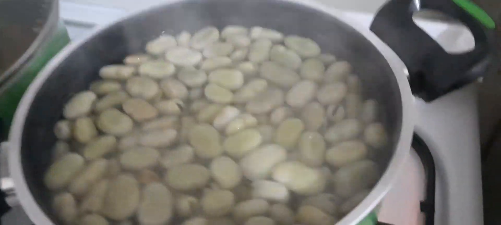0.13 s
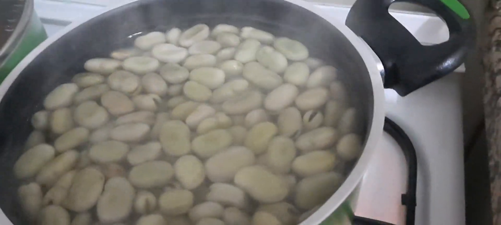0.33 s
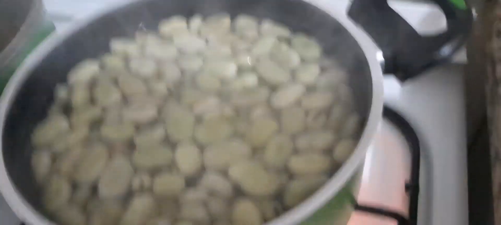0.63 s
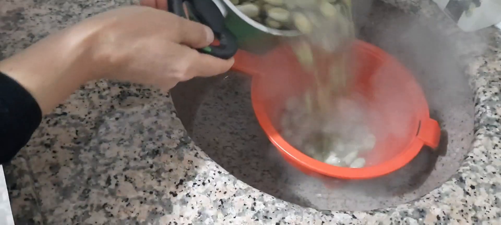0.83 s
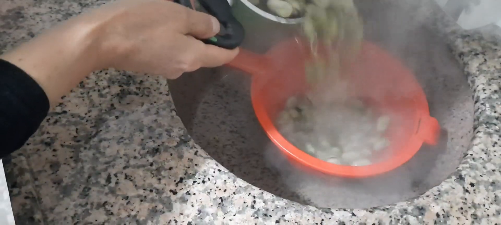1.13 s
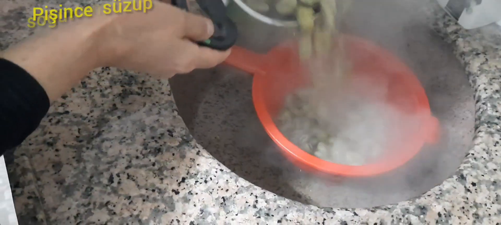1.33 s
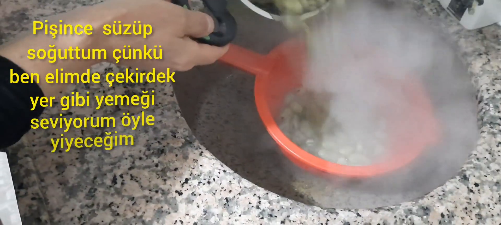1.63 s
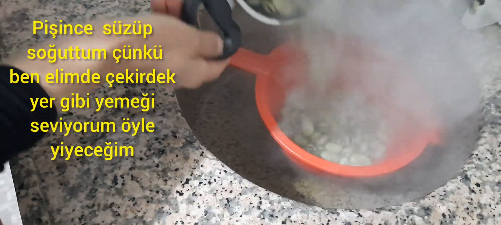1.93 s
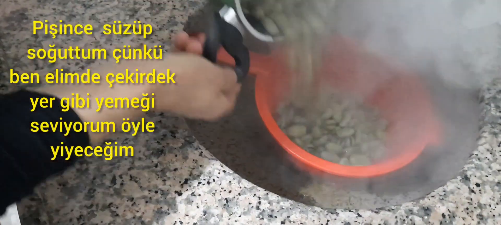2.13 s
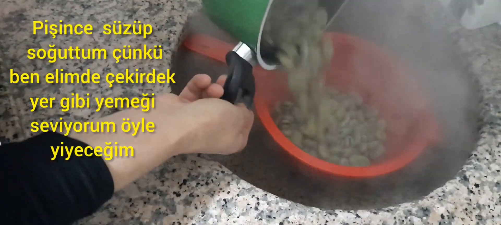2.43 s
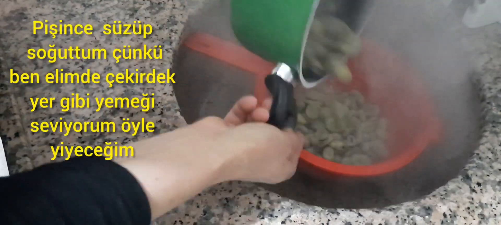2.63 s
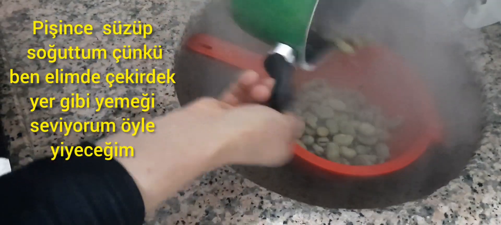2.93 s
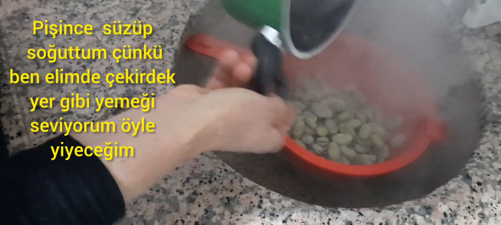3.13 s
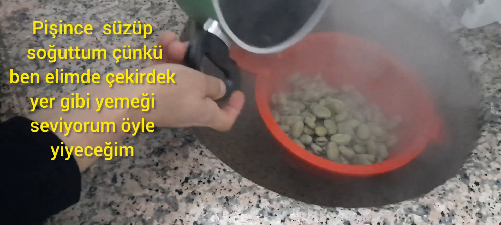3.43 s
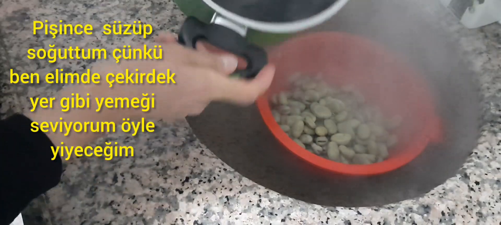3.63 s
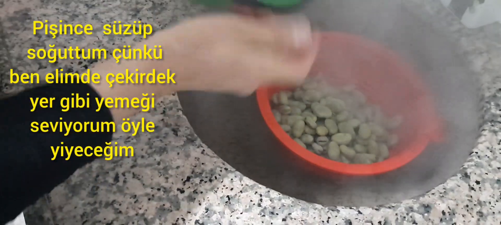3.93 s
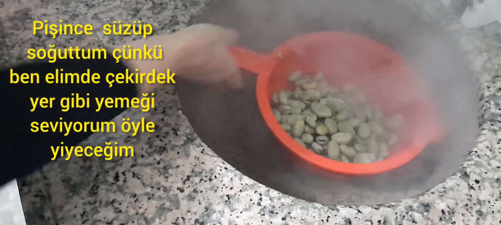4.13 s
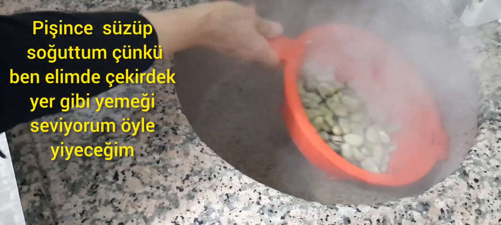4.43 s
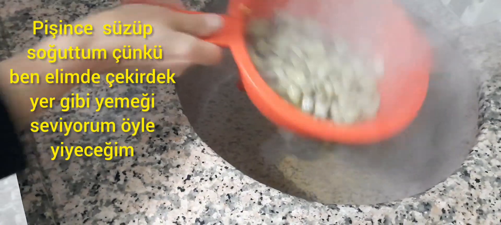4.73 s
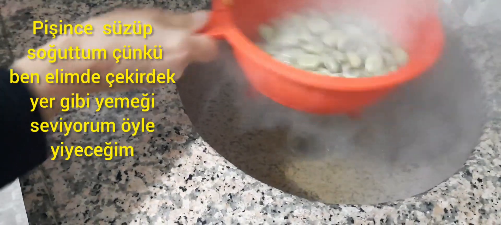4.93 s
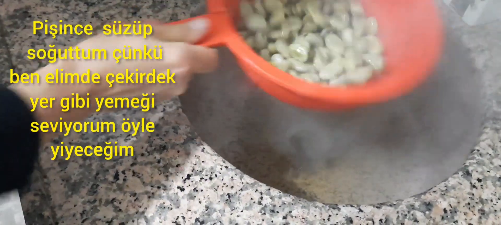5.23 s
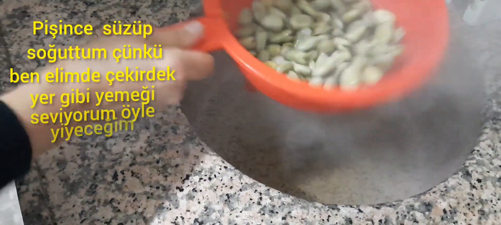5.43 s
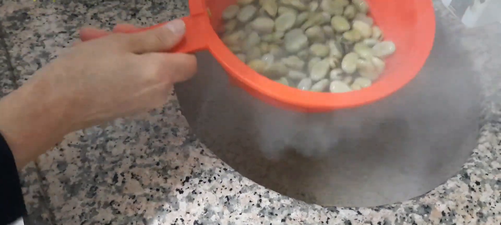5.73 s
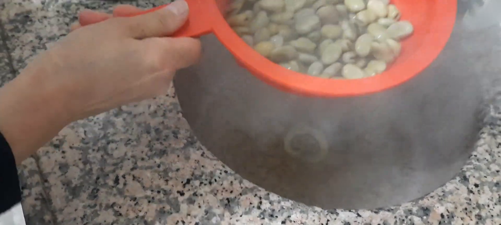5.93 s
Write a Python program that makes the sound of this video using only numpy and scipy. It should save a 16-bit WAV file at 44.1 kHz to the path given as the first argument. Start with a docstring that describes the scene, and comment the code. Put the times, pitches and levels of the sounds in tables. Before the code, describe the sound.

A soft gas burner hisses over low kitchen hum, then cuts to a close, loud pour: water and beans crash through a plastic colander into a steel sink, with drumming, thuds and sharp drops. The pot rings as it rubs the sink edge, water thins to trickling, the colander knocks and wet beans rustle as they are tossed. A hard pot knock is cut off. Close stereo pickup, small reflective kitchen.

```python
"""Beans and their water are emptied from a pot into a plastic colander in a steel sink, close to a microphone pair.
Before that, a gas stove hisses over the hum and rumble of the kitchen; a short silence parts the two scenes.
Filtered random impacts make water and rustling; decaying modes make sink, pot and colander ring as they are struck.
The pot rubs the sink's edge, the colander is dragged, knocked and tossed; a last pot knock is cut into silence."""
import sys
import numpy as np
from scipy import signal
from scipy.fft import rfft, irfft
from scipy.io import wavfile
from scipy.ndimage import uniform_filter1d

SR = 44100
rng = np.random.default_rng(int(sys.argv[2]) if len(sys.argv) > 2 else 0)


def wrap_up_sound(samples):
    """Save the sound to the file named by the first command line argument, as 16-bit audio."""
    columns = np.atleast_2d(samples).T
    # keep every value between -1 and 1, then stretch to whole-number steps
    tamed = np.clip(columns, -1, 1)
    steps = np.round(tamed * 32767).astype(np.int16)
    wavfile.write(sys.argv[1], SR, steps)


N = 268436
TIME, HZ = np.arange(N) / SR, np.fft.rfftfreq(N, 1 / SR)
STOVE_SPAN_S, SINK_SPAN_S = (0, 0.657), (0.677, 5.799)  # start and end of each scene
LEFT_LAG = 12  # samples by which the left port hears later

# Splashing water before any tilt. Each row: frequency in Hz, spectrum level in dB per Hz.
SPLASH = [(240, -34.5), (400, -7), (432, -1), (588, -12), (666, -11.5), (789, -3.5), (1200, -8.5),
          (1420, -5.5), (1840, -8), (3580, -8.5), (5960, -10.5), (8000, -9), (9100, -18), (10600, -22.5),
          (11800, -12.5), (16000, -24.5)]
# Modes of the steel basin. Each row: frequency in Hz, width in Hz, level in dB before any tilt.
SINK = [(64.4, 5.7, -11.5), (102, 21.3, 0), (150.8, 83, -9), (199.4, 34, -6), (294.7, 11.9, 4),
        (378, 43, -5.5), (595.4, 44.4, -7), (786, 36, -10), (1540, 106, -28)]
# Modes of the plastic colander. Each row: frequency in Hz, width in Hz, level in dB.
COLANDER = [(106.3, 14, 2), (286, 15, 4), (404, 37, -6.5), (498, 13, -11), (920, 46, 4.5), (1210, 640, -12),
            (1634, 220, -6), (2110, 260, -5), (2514, 250, -12), (3553, 220, -34.5), (4330, 170, -29)]
# The stream as the pot is tipped, eased back, then upended. Each row: time in seconds, level in dB.
FLOW = [(0.679, -42.5), (0.725, -37.5), (0.751, -34), (0.9, -36.5), (1.32, -36.5), (1.43, -38.5),
        (1.6, -39), (1.94, -42), (2.04, -40), (2.17, -45), (2.3, -39), (2.55, -42.5), (2.671, -50.5),
        (2.82, -64)]


def amp(db):
    """Decibels as a linear gain."""
    return 10 ** (np.asarray(db) / 20)


def evened(x):
    """Unit rms, as heard in the middle of the pair."""
    return x / np.sqrt(np.mean(np.atleast_2d(x).mean(0) ** 2) + 1e-20)


def peaked(x):
    """Unit peak."""
    return x / abs(x).max()


def read(points, hz):
    """Reads a table of (Hz, value) along a log-frequency axis."""
    f, value = np.transpose(points)
    return np.interp(np.log(hz + 1), np.log(f + 1), value)


def level(s, db):
    """A dB curve as a gain, practically silent outside its span."""
    return amp(np.interp(TIME, s, db, left=-120, right=-120))


def swell(start, length, rise_s, fall_s):
    """A gain that rises, holds to the end of its length, then dies away."""
    age = TIME - start
    return np.clip(age / rise_s, 0, 1) * np.exp(-np.maximum(age - length, 0) / fall_s)


def add(mix, s, sound):
    """Lays a sound into the mix from the given second."""
    part = mix[round(s * SR):][:len(sound)]
    part += sound[:len(part)]


def colour(x, spectrum, tilt_db=0):
    """Causal minimum-phase filter with the given spectrum, tilted by dB per octave."""
    hz = abs(np.fft.fftfreq(2048, 1 / SR))
    tilt = tilt_db * np.log2(hz / 1000 + .1)
    log_gain = np.log(amp(np.maximum(read(spectrum, hz) + tilt, -90)))
    taps = np.fft.ifft(np.exp(np.conj(signal.hilbert(log_gain)))).real
    return signal.oaconvolve(x, taps)[:len(x)]


def ring(modes, tilt_db=0):
    """The answer of a body to one blow; a harder contact tilts it towards the high modes."""
    t = TIME[:SR // 3]
    total = 0
    for k, (hz, width, db) in enumerate(modes):
        strength = (-1) ** k * amp(db + tilt_db * np.log2(hz)) * width
        total = total + strength * np.exp(-np.pi * width * t) * np.sin(2 * np.pi * hz * t)
    return total


def patter(per_s, spread_db):
    """Random impacts of either sign, their sizes spread exponentially in dB."""
    size = amp(spread_db * np.minimum(rng.exponential(1, N), 4.5))
    return size * rng.choice([-1, 1], N) * (rng.random(N) < per_s / SR)


def wander(rate_hz):
    """Smooth random drift of unit rms."""
    return evened(irfft(rfft(rng.standard_normal(N)) / (1 + (HZ / rate_hz) ** 4), N))


def patchy(x, depth_db):
    """The colour changes at random over patches of about 7 ms and 1.7 kHz."""
    z = signal.stft(x, nperseg=128)[2]
    field = uniform_filter1d(rng.standard_normal(z.shape), size=5, axis=0)
    field = uniform_filter1d(field, size=5, axis=1)
    return signal.istft(z * amp(depth_db * field / field.std()), nperseg=128)[1][:N]


def space(x, wet_db, t60, lag=LEFT_LAG, count=4):
    """Direct sound reaches the right port first; scattered paths fade in and out in turn, 9 times a second."""
    t = TIME[:SR // 4]
    tails = rng.standard_normal((count, 2, len(t))) * amp(-60 * t / t60) * (t > .001)
    tails /= np.linalg.norm(tails, axis=2, keepdims=True)
    # thinning the bass of the scatter keeps it alike at both ports
    tails = signal.sosfilt(signal.butter(2, 620, "high", fs=SR, output="sos"), tails)
    wet = 0
    for k, tail in enumerate(tails):
        share = np.maximum(np.cos(2 * np.pi * (9 * TIME - k / count)), 0)
        wet = wet + signal.oaconvolve((x * share)[None], tail, axes=1)[:, :N]
    return np.array([np.roll(x, lag), x]) + amp(wet_db) * wet


def slap(fall_s):
    """A short wet splat of unit peak: decaying noise in the colour of water."""
    t = TIME[:SR // 3]
    return peaked(colour(rng.standard_normal(len(t)) * np.exp(-t / fall_s), SPLASH, tilt_db=-5.0))


def click(bright_db):
    """An abrupt click and a brief scatter of spray, of unit peak."""
    t = TIME[:SR // 20]
    spray = .2 * rng.standard_normal(len(t)) * np.exp(-t / .0016)
    return peaked(colour(np.exp(-t / .00004) + spray, SPLASH, bright_db))


def splats(per_s, fall_s):
    """Lumps of water burst at random: each starts abruptly and dies away. Unit mean."""
    hits = abs(patter(per_s, spread_db=1.0))
    bursts = signal.lfilter([1], [1, -np.exp(-1 / (fall_s * SR))], hits)
    return bursts / bursts.mean()


def bubbles(cycles, count=1500):
    """Small bubbles, starting at 700 to 8400 Hz, die away over some cycles and rise in pitch."""
    out = np.zeros(N)
    for when, small, loud in rng.random((count, 3)):
        age = 700 * 12 ** small * TIME[:2000] / cycles
        tone = np.exp(-age) * np.sin(2 * np.pi * cycles * age * (1 + .03 * age))
        add(out, when * TIME[-1], amp(15 * loud ** 2) * tone)
    return evened(out)


def stream(db, follow):
    """A gain that is db when the flow is at -37 dB and changes by follow dB per dB of flow."""
    s, flow_db = np.transpose(FLOW)
    return level(s, db + follow * (flow_db + 37))


def dregs():
    """Gains of the splash and of the weight as the last clumps slide out of the pot."""
    # Each row: start in seconds, length in seconds, splash level in dB, weight on the basin in dB.
    clumps = [(2.813, 0.097, -46, -43), (2.904, 0.18, -64.5, -49.5), (3.108, 0.1, -61, -50)]
    return sum(amp([[splash_db], [weight_db]]) * swell(s, length, rise_s=0.011, fall_s=0.032)
               for s, length, splash_db, weight_db in clumps)


def kitchen():
    """A motor hum, wavering in pitch and level, over low rumble made of filtered noise."""
    # Kitchen rumble. Each row: frequency in Hz, spectrum level in dB per Hz.
    rumble_tone = [(25, -21), (45, -15), (65, -5), (100, 1.5), (160, -8), (300, -12), (600, -21.5),
                   (1500, -38), (4000, -66)]
    # Motor partials. Each row: mean frequency in Hz, rms level in dB before the wavering.
    partials = [(102.3, -54.5), (199.2, -78.5), (301.5, -74.5)]
    turns = np.cumsum(1 + 0.0096 * wander(rate_hz=4.3)) / SR
    hum = sum(amp(db) * np.sqrt(2) * np.sin(2 * np.pi * hz * turns) for hz, db in partials)
    hum = hum * amp(2.2 * wander(rate_hz=4.5))
    rumble = evened(space(colour(rng.standard_normal(N), rumble_tone), wet_db=5.5, t60=0.089))
    return hum + amp(-61.0) * rumble


def stove():
    """Gas hisses and whistles through the burner's jets, noise ringing in resonances, over a low flame noise."""
    # Burner resonances. Each row: frequency in Hz, width in Hz, level in dB.
    burner = [(1550, 67, 2.5), (2047, 61, 1.5), (3800, 210, -5.5), (6500, 94, 2.5), (6870, 160, -2),
              (8350, 130, -12), (10620, 160, -5), (11700, 350, -11), (14000, 300, -12)]
    # Gas hiss. Each row: frequency in Hz, spectrum level in dB per Hz.
    hiss_tone = [(180, -41), (300, -12), (1320, -32), (1970, -4), (2610, -54), (3890, -14.5), (5160, -23),
                 (6850, -10.5), (9240, -25.5), (14000, -18), (16000, -33)]
    whistle = signal.oaconvolve(rng.standard_normal(N), ring(burner))[:N]
    hiss = colour(rng.standard_normal(N), hiss_tone)
    flame = colour(rng.standard_normal(N), [(20, -24.0), (55, 13), (110, 1.5), (200, -14), (600, -39.5)])
    gas = amp(-0.5) * evened(whistle) + amp(-2.5) * evened(hiss)
    gas = evened(space(gas, wet_db=16, t60=0.085))
    return (amp(-67) * gas + amp(-58.5) * evened(flame)) * (TIME < STOVE_SPAN_S[1])


def pour():
    """Drops splash in the colander and on the far wall while the weight of the stream drums on the steel below."""
    late_splash, late_weight = dregs()
    near, far = [evened(patchy(colour(patter(per_s=5000, spread_db=4), SPLASH), depth_db=2)) for _ in range(2)]
    near_water = evened(space(near + amp(-11.5) * bubbles(cycles=5), wet_db=7, t60=0.07))
    far_water = evened(space(far, wet_db=-1, t60=0.046))[::-1]  # ports swapped: the opposite side
    water = evened(near_water + amp(-7.5) * far_water)
    water = water * amp(1.14 * wander(rate_hz=33)) * (1 + 0.17 * splats(per_s=120, fall_s=0.0032))

    spray = patchy(colour(patter(per_s=170, spread_db=4.2), SPLASH, tilt_db=3), depth_db=4)
    spray = evened(space(spray, wet_db=-5, t60=0.035))[::-1]  # spray lands on the opposite side
    splash = amp(-1.45) * water + amp(-8.5) * spray

    drum = signal.oaconvolve(patter(per_s=900, spread_db=-1.5), ring(SINK))[:N]
    drum = evened(space(drum, wet_db=-13, t60=0.054))
    weight = stream(db=-37.5, follow=0.86) + late_weight
    weight = weight * amp(1.6 * wander(rate_hz=16))  # the beans come in lumps
    return splash * (level(*np.transpose(FLOW)) + late_splash) + drum * weight


def slosh():
    """The thin floor of the basin heaves under the falling water: sparse impacts, low-pitched."""
    heave_tone = [(20, -30.5), (45, -13), (62, -1.5), (110, -3), (170, -11), (300, -25), (900, -75)]
    heave = colour(patter(per_s=93, spread_db=4), heave_tone)
    return evened(heave) * (stream(db=-49, follow=0.25) + amp(-7.5) * dregs()[1])


def thuds():
    """Each clump of beans rings the basin and throws a splat of water."""
    # Clumps landing. Each row: time in seconds, direct peak of the thud in dB, wet slap in dB re the thud.
    landings = [(0.737, -16.5, -9.5), (0.749, -18, -9.5), (0.801, -26, 5.5), (1.079, -31, 6),
                (1.183, -24.5, -2), (1.208, -31.5, -6), (1.257, -35, 12), (1.29, -26, -3),
                (1.527, -28, -16), (1.568, -44.5, 18.5), (1.784, -30, -12), (1.962, -30, -15.5),
                (2.04, -31, -11), (2.186, -33, -16), (2.682, -36, -10), (2.798, -32.5, -9),
                (2.886, -31, -4), (3.16, -38, -5), (5.385, -38, -12)]
    out, body = np.zeros(N), peaked(ring(SINK, tilt_db=-0.4))
    for s, db, slap_db in landings:
        add(out, s, amp(db) * (body + amp(slap_db) * slap(fall_s=0.0064)))
    return space(out, wet_db=0.0, t60=0.073)


def snaps():
    """Single sharp drops snap on plastic and steel."""
    # Each row: time in seconds, direct peak in dB, brightness in dB per octave.
    drops = [(0.7452, -7.5, 8.5), (0.801, -13.5, 0), (0.882, -19, 3), (1.0172, -12, 0), (1.1434, -21.5, -6),
             (1.2403, -19, 7), (1.3282, -13, 1.5), (1.638, -12.5, 7), (1.7797, -9, 11.5), (2.0342, -13, 12),
             (2.048, -15, 10), (2.2004, -23, 10), (2.5192, -16.5, -2), (2.5528, -16.5, 2.5),
             (2.7118, -28, 4.5), (2.7441, -25, 2), (2.8251, -22.5, 2), (3.1272, -30, 12), (4.994, -28, 13),
             (5.2592, -25.5, 6.5), (5.5216, -26, 1), (5.5626, -31, 13)]
    out = np.zeros(N)
    for s, db, bright_db in drops:
        add(out, s, amp(db) * click(bright_db))
    return space(out, wet_db=-4, t60=.08)


def plops():
    """A large air pocket trapped in the pooling water rings briefly and rises in pitch as it surfaces."""
    # Each row: time in seconds, level in dB, starting pitch in Hz.
    pockets = [(1.662, -31, 575), (1.836, -25.5, 558)]
    rise_s, fall_s, glide_hz_per_s = 0.003, 0.006, 4800
    out, t = np.zeros(N), TIME[:SR // 10]
    envelope = peaked((1 - np.exp(-t / rise_s)) * np.exp(-t / fall_s))
    for s, db, hz in pockets:
        add(out, s, amp(db) * envelope * np.sin(2 * np.pi * t * (hz + glide_hz_per_s * t / 2)))
    return space(out, wet_db=-9, t60=0.076, lag=LEFT_LAG // 2)


def pot_rubs():
    """Each rub on the sink's edge pumps up the pot's modes, which ring out; the contact point favours one."""
    # Each row: time in seconds, direct peak of the ringing in dB, length in seconds,
    # brightness in dB per octave, favoured mode in Hz.
    contacts = [(2.283, -17, 0.028, 2.5, 1086), (2.296, -16, 0.035, 1, 610),
                (2.367, -20.5, 0.029, -1.5, 609), (2.425, -25.5, 0.052, 4, 570),
                (3.430, -37, 0.044, 2, 1130), (3.44, -45.5, 0.024, 16, 4855),
                (3.642, -42.5, 0.011, -23, 635), (3.7, -43.5, 0.042, 5, 650), (3.855, -36, 0.064, -26, 616),
                (3.922, -45.5, 0.033, -8, 633), (3.939, -42.5, 0.042, 7.5, 1840),
                (4.155, -50.5, 0.015, 5, 641)]
    # Modes of the pot. Each row: frequency in Hz, width in Hz, level in dB before favour and brightness.
    pot = [(583, 18, -9.5), (644.1, 19.6, -5), (658.2, 5.7, -8), (783, 25, -16.5), (1047, 15, -24),
           (1184, 14, -14), (1865, 9, -23), (1930, 40, -21), (2295, 60, -28), (2710, 40, -33.5),
           (2990, 56, -23), (3290, 110, -25.5), (3660, 38, -27), (4820, 25, -32.5)]
    out, t = np.zeros(N), TIME[:SR // 4]
    for s, db, length, bright_db, favoured_hz in contacts:
        press, wall = np.sin(np.pi * np.minimum(t / length, 1)), 0
        for hz, width, mode_db in pot:
            build = signal.lfilter([width], [1, -np.exp(-np.pi * width / SR)], press)
            drift = np.cumsum(rng.standard_normal(len(t))) * 0.025  # uneven slips blur the pitch
            favour_db = 11 * np.exp(-(np.log(hz / favoured_hz) / 0.07) ** 2)
            gain = amp(mode_db + favour_db + bright_db * np.log2(hz))
            wall = wall + gain * build * np.sin(2 * np.pi * hz * t + drift)
        scrape = colour(press * rng.standard_normal(len(t)), SPLASH, tilt_db=2.0)
        add(out, s, amp(db) * (peaked(wall) + amp(-11 + 0.65 * bright_db) * peaked(scrape)))
    return space(out, wet_db=-4, t60=0.23, lag=LEFT_LAG // 2)


def drip():
    """Water runs out through the colander's holes; once it is lifted the drops make bare steel sing."""
    # Water draining from the beans. Each row: time in seconds, level in dB before the steel is added.
    drain = [(2.5, -58), (3.1, -62.5), (4.0, -62), (4.6, -66), (4.83, -59.5), (5.3, -58), (5.781, -71)]
    # Fine patter of that water. Each row: frequency in Hz, spectrum level in dB per Hz.
    trickle = [(470, -21), (800, 4.5), (930, -12.5), (1140, -4.5), (1950, -1.5), (2290, -4), (3880, -6),
               (7930, -3), (9450, -18), (11800, -8.5), (16000, -14.5)]
    # Bare steel under it. Each row: frequency in Hz, width in Hz, level in dB.
    steel = [(2933, 330, -3.5), (3990, 220, 0.5), (5190, 89, -9.5)]
    drops = patter(per_s=4900, spread_db=5.0)
    sing = amp(2.5) * evened(signal.oaconvolve(drops, ring(steel))[:N])
    sing = sing * swell(start=4.65, length=0.2, rise_s=0.07, fall_s=0.68)
    wet = space(evened(colour(drops, trickle)) + sing, wet_db=18.0, t60=0.12)
    return evened(wet) * level(*np.transpose(drain))


def drag():
    """The loaded colander slips a little way over the floor of the basin: a scrape of filtered impacts."""
    # The slip before the lift. One row: start in seconds, length in seconds, level in dB.
    s, length, db = (4.313, 0.02, -54)
    # Its scrape. Each row: frequency in Hz, spectrum level in dB per Hz.
    scrape_tone = [(120, -15), (250, -24), (298, 4), (350, -23), (850, -14.5), (1000, -18), (1200, -42),
                   (4000, -44)]
    scrape = colour(patter(per_s=1400, spread_db=1.5), scrape_tone)
    scrape = evened(space(scrape, wet_db=-9.0, t60=0.062))
    return amp(db) * scrape * swell(s, length, rise_s=0.0042, fall_s=0.12)


def knocks():
    """Each knock clicks, rings the plastic bowl and shakes a splat of water from it."""
    # Each row: time in seconds, direct peak of the ring in dB, direct peak of the click in dB,
    # brightness of the click in dB per octave.
    blows = [(4.509, -25, -25.5, -2.5), (4.532, -32, -42, -8), (5.077, -39, -45, 0),
             (5.143, -40, -24.5, 4.5), (5.158, -42, -38, -14), (5.286, -39, -24.5, 2.5),
             (5.4981, -40, -23, 3.5), (5.611, -35.5, -31, -5.5)]
    rings, clicks, body = np.zeros(N), np.zeros(N), peaked(ring(COLANDER))
    for s, db, click_db, bright_db in blows:
        add(rings, s, amp(db) * (body + amp(-10.5) * slap(fall_s=0.0091)))
        add(clicks, s, amp(click_db) * click(bright_db))
    return space(rings, wet_db=3, t60=0.26) + space(clicks, wet_db=3, t60=0.08)


def basin_boom():
    """Relieved of the colander, the floor of the basin springs back, mostly in its lowest modes."""
    out = np.zeros(N)
    add(out, 4.541, amp(-31.5) * peaked(ring(SINK, tilt_db=-7.5)))
    return out


def shake():
    """Soft wet beans slide over each other and bump the plastic as the colander is tossed."""
    # Sliding beans before the tilt. Each row: frequency in Hz, spectrum level in dB per Hz.
    rustle_tone = [(88, -44), (150, -14.5), (231, -16.5), (291, -4.5), (414, -18), (601, -11), (790, -20.5),
                   (1120, -20), (1560, -13), (2200, -18.5), (5680, -31), (7620, -27.5), (9820, -37.5),
                   (11700, -33.5), (15100, -39), (16000, -34)]
    # Tosses of the colander. Each row: start in seconds, length in seconds, level in dB.
    tosses = [(4.806, 0.077, -57), (4.879, 0.1, -47.5), (5.012, 0.065, -48.5), (5.12, 0.045, -42.5),
              (5.239, 0.2, -47), (5.442, 0.19, -49.5)]
    rustle = patchy(colour(patter(per_s=1700, spread_db=4.0), rustle_tone, tilt_db=-2.18), depth_db=-2.0)
    rustle = rustle * (1 + 0.21 * splats(per_s=120, fall_s=0.008))
    rustle = evened(space(rustle, wet_db=4.0, t60=0.14))
    bumps = signal.oaconvolve(patter(per_s=250, spread_db=-0.5), ring(COLANDER[1:4]))[:N]  # low modes only
    bumps = evened(space(bumps, wet_db=-3, t60=0.085))
    gains = [amp(db) * swell(s, length, rise_s=0.032, fall_s=0.066) for s, length, db in tosses]
    return (rustle + amp(-7.0) * bumps) * np.max(gains, axis=0)


def last_knock():
    """The pot is set down hard: its wall swings in its main mode, flat under the load, and its base grates."""
    # Grating of the base. Each row: frequency in Hz, spectrum level in dB per Hz.
    grate = [(60, -5.5), (200, -8.5), (400, 3.5), (1000, -0.5), (1350, -5.5), (1900, -1.5), (2300, -14.5),
             (4200, -11), (6000, -12.5), (8000, -21.5), (9500, -28.5), (12500, -29), (16000, -43)]
    start_s, lean_db = 5.777, 6  # the wall's lean to the left, ahead of the microphone's own
    t, wall, base = TIME[:SR // 10], np.zeros(N), np.zeros(N)
    swing = np.interp(t, [0, .003, .012, .017, .021], [0, 0.79, 0.6, 0.74, 0.0])
    grit = colour(rng.standard_normal(len(t)), grate)
    add(wall, start_s, amp(-11.5) * swing * np.sin(2 * np.pi * 629 * t))
    add(base, start_s, amp(-26.5) * evened(grit) * (1 - np.exp(-t / 0.00025)))
    wall_pair = amp(lean_db * np.array([[.5], [-.5]])) * np.array([np.roll(wall, LEFT_LAG // 2), wall])
    return wall_pair + space(base, wet_db=7, t60=0.021)


def scene():
    """Room, stove, water, beans, colander and pot together at the microphone pair."""
    water = pour() + slosh() + plops() + drip() + snaps()
    colander = drag() + shake() + knocks() + basin_boom()
    return kitchen() + stove() + water + thuds() + colander + pot_rubs() + last_knock()


def record(dry):
    """The left port is the more sensitive over most of the range; the scenes are cut hard, then band-limited."""
    # Microphone pair. Each row: frequency in Hz, left minus right in dB.
    lean = [(60, -2), (110, 2), (200, -2.5), (380, 3), (700, 3), (1290, 3), (2380, 4.5), (4400, 1.5),
            (8120, 3.5), (15000, 8.5)]
    leaning = irfft(rfft(dry) * amp(np.array([[.5], [-.5]]) * read(lean, HZ)), N)
    kept = sum((TIME >= start) & (TIME < end) for start, end in (STOVE_SPAN_S, SINK_SPAN_S))
    low_pass = signal.firwin(1023, 16200, window=("kaiser", 9), fs=SR)  # edge in Hz
    return signal.oaconvolve(leaning * kept, low_pass[None], "same")


dry = scene()
out = record(dry)
wrap_up_sound(out)
```